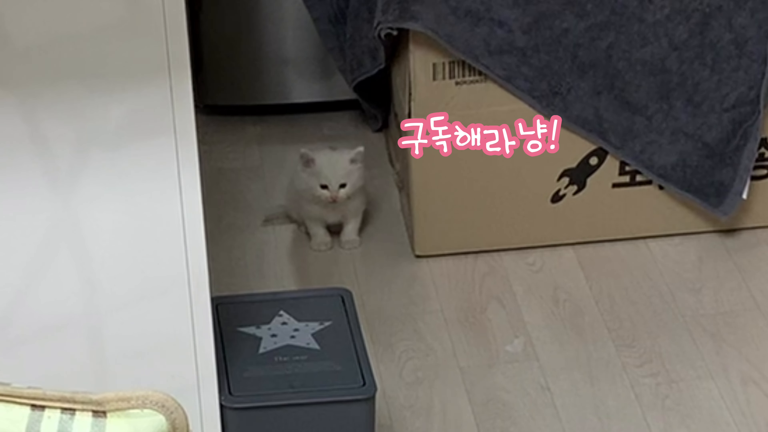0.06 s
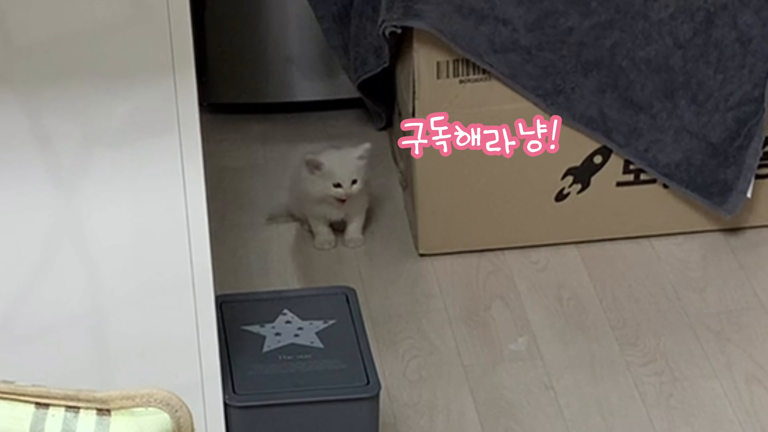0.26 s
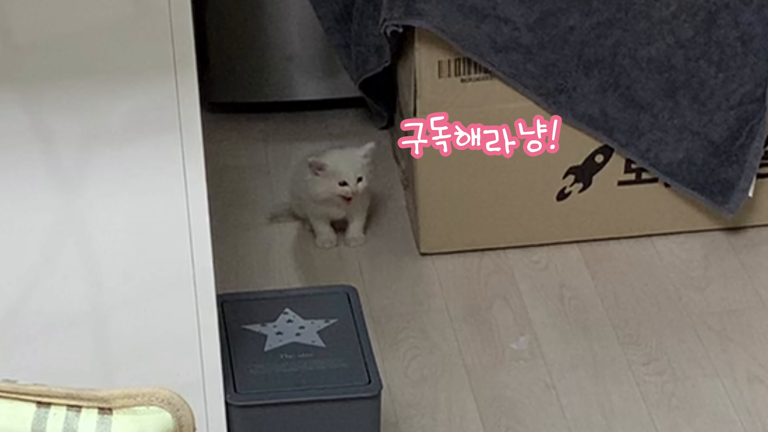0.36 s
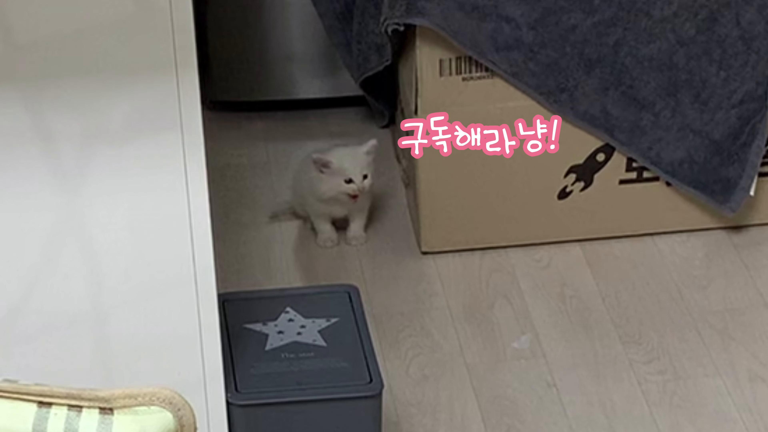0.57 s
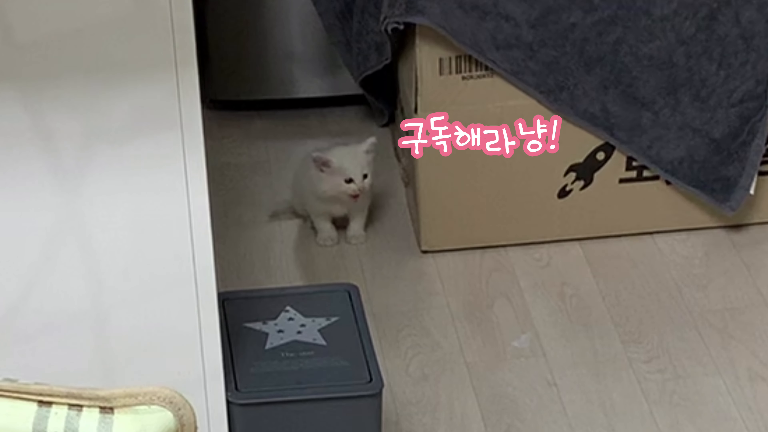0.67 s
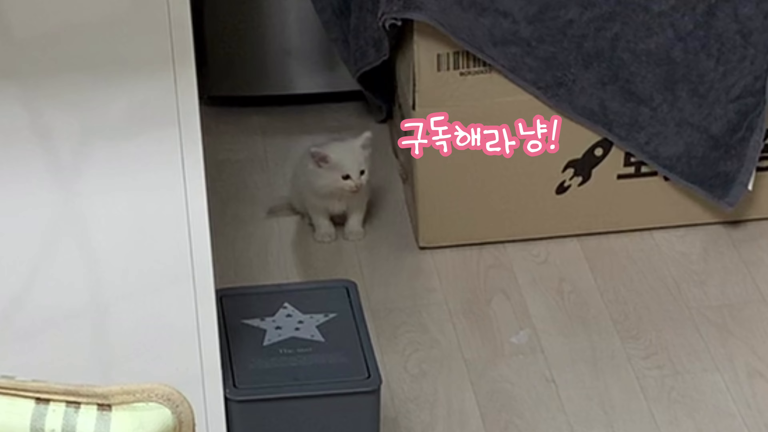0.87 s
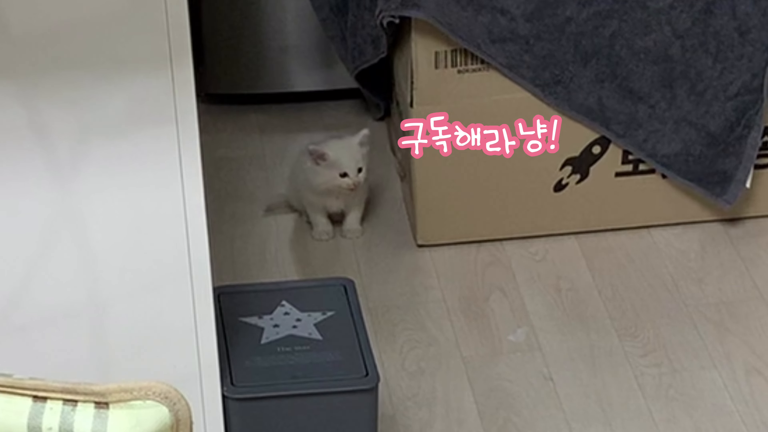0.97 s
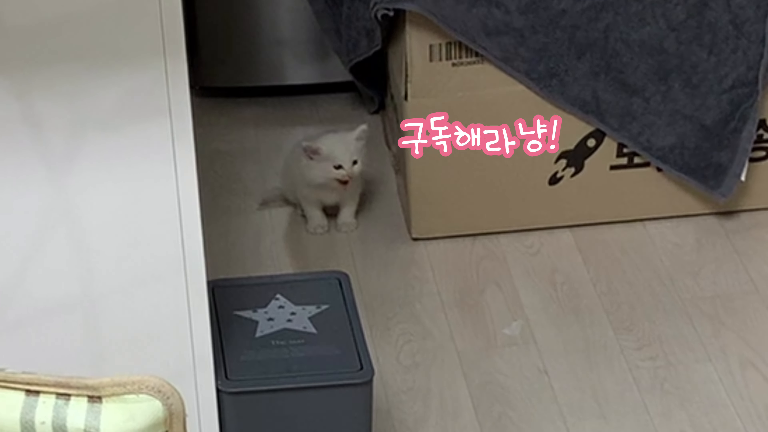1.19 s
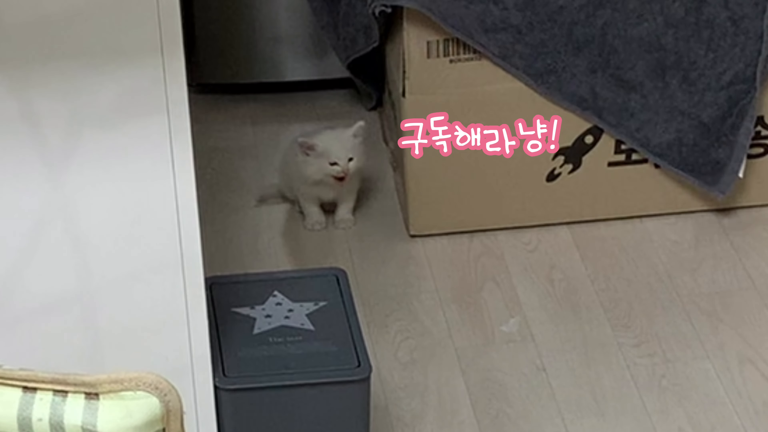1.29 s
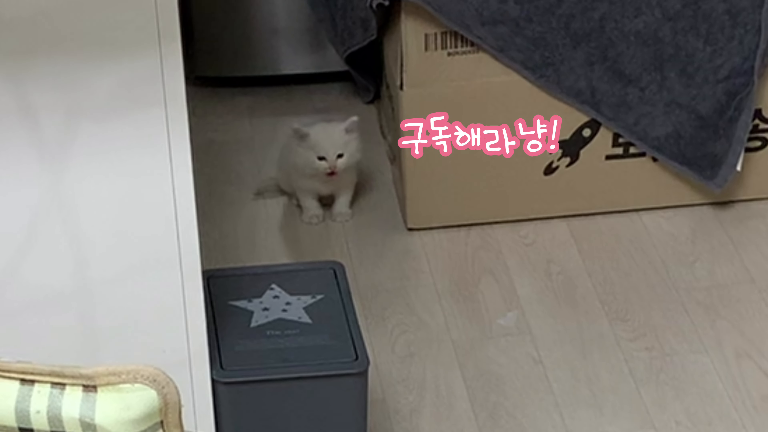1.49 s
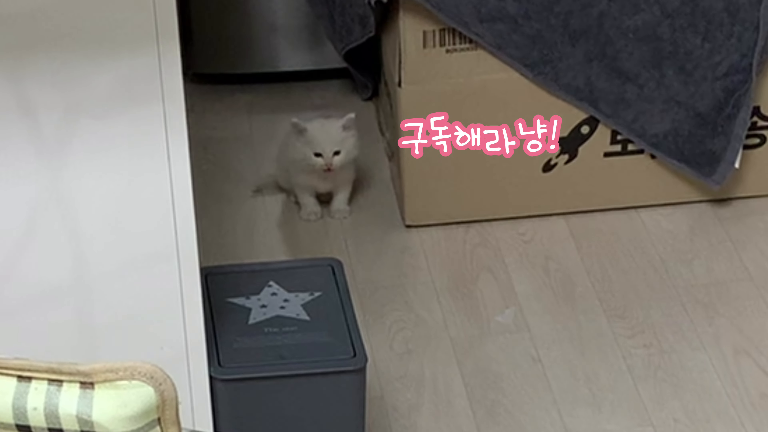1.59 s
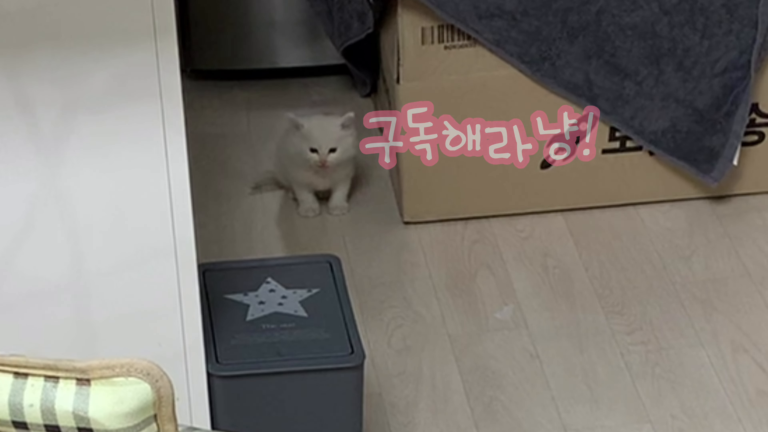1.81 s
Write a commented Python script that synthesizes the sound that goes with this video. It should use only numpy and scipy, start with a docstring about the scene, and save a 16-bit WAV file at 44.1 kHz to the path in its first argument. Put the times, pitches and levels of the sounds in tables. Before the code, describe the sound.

A kitten gives two short meows, each starting hoarse, quickly rising clear and bright, then sinking to a rough, dull close. Hard floor and furniture reflect them in a quiet home, heard from a little distance.

```python
"""Two meows from a kitten on a wooden floor: each starts hoarse, clears, then sinks and roughens to a dull "ow".
Floor and furniture answer at once, the quiet room rings briefly, and a faint rumble lies underneath.
A cry is vocal-fold harmonics and pulsed air noise, shaped by resonances that shift as the mouth closes.
Room answers are decaying stereo noise; the background is filtered noise with two steady drones and a hum."""
import sys
import numpy as np
from scipy import signal
from scipy.fft import rfft, irfft, next_fast_len
from scipy.io import wavfile
from scipy.ndimage import map_coordinates

SR = 44100
rng = np.random.default_rng(int(sys.argv[2]) if len(sys.argv) > 2 else 0)


def digitize_waveform(pressure):
    """Quantize a signal to 16-bit integers and store it at the path in sys.argv[1].

    Rows of a 2-D input are taken as channels; values are limited to [-1, 1].
    """
    field = np.atleast_2d(pressure).T
    bounded = np.clip(field, -1, 1)
    quanta = np.round(bounded * 32767).astype(np.int16)
    wavfile.write(sys.argv[1], SR, quanta)


N = 81585  # length in samples


def amp(db):
    """Decibels to amplitude gain."""
    return 10 ** (np.asarray(db) / 20)


def unit(x):
    """Scale to rms 1."""
    return x / np.sqrt(np.mean(x ** 2) + 1e-20)


def along(points, hz):
    """Read (Hz, value) points at hz, in straight lines on a log frequency axis."""
    point_hz, values = np.transpose(points)
    return np.interp(np.log(hz + 1), np.log(point_hz + 1), values)


def curves(rows, t):
    """Read each column after the time at the times t."""
    seconds, *columns = np.transpose(rows)
    return [np.interp(t, seconds, column) for column in columns]


def wobble(rate, size):
    """A smooth random curve with rate knots a second."""
    return map_coordinates(rng.standard_normal(4096), [np.arange(size) * rate / SR], mode="wrap")


def filtered(x, response):
    """Multiply the spectrum of x by a response of frequency, which may be complex."""
    m = next_fast_len(x.shape[-1] + 8192)
    return irfft(rfft(x, m) * response(np.fft.rfftfreq(m, 1 / SR)), m)[..., :x.shape[-1]]


# How alike diffuse sound is at the left and right of the stereo pickup.
# Each row: frequency in Hz, left-right correlation [0-1].
LIKENESS = [(100, .95), (700, .72), (1400, .4), (2200, .2), (3000, .65), (4000, .92), (7000, .95),
            (15000, .93)]


def diffuse(size):
    """Stereo white noise as from all sides: more shared mid noise makes left and right more alike."""
    def mid_side_gains(hz):
        angle = np.arccos(np.clip(along(LIKENESS, hz), -1, 1)) / 2
        return np.array([np.cos(angle), np.sin(angle)])

    mid, side = filtered(rng.standard_normal((2, size)), mid_side_gains)
    return np.array([mid + side, mid - side])


def drone(centre, width):
    """A narrow band of stereo noise, rms 1, at half amplitude one width from its centre."""
    return unit(filtered(diffuse(N), lambda hz: 1 / (1 + ((hz - centre) / width) ** 2)))


# Spectrum shape of the faint room rumble. Each row: frequency in Hz, relative density in dB per Hz.
RUMBLE_SPECTRUM = [(25, -31.5), (50, -6.5), (110, -6.5), (300, -1.5), (520, -10), (850, -4.5),
                   (1200, -15.5), (2000, -24), (4000, -32), (8000, -38), (14000, -35.5), (15500, -45)]
RUMBLE_DB = -64  # rms level


def rumble():
    """Diffuse noise filtered to the spectrum of the quiet room."""
    return amp(RUMBLE_DB) * unit(filtered(diffuse(N), lambda hz: amp(along(RUMBLE_SPECTRUM, hz))))


# Narrow bands that stand in the background. Each row: centre in Hz, width in Hz, rms level in dB.
STEADY_BANDS = [(118, 14, -73), (730.4, 6.3, -76)]


def steady_drones():
    """Narrow noise bands held at constant levels."""
    return sum(amp(db) * drone(centre, width) for centre, width, db in STEADY_BANDS)


# Swells of the low hum. Each row: time in seconds, level in dB before HUM_GAIN_DB.
HUM_LEVEL = [(0.0, -67), (0.262, -56.5), (0.314, -69.5), (0.958, -76.5), (1.03, -54.5), (1.086, -68),
             (1.272, -61), (1.314, -72.5), (1.514, -60.5), (1.73, -80), (1.762, -60), (1.85, -63)]
HUM_HZ, HUM_WIDTH_HZ, HUM_GAIN_DB = 212.7, 23, -0.5


def hum():
    """A low narrow band of noise that swells and fades."""
    level_db, = curves(HUM_LEVEL, np.arange(N) / SR)
    return amp(level_db + HUM_GAIN_DB) * drone(HUM_HZ, HUM_WIDTH_HZ)


def background():
    """Room tone: the rumble, the steady drones and the hum added together."""
    return rumble() + steady_drones() + hum()


# Decay of the room tail. Each row: frequency in Hz, time to fall 60 dB in seconds.
TAIL_T60 = [(200, 0.18), (700, 0.48), (2500, 0.36), (5000, 0.24), (8000, 0.16), (15000, 0.067)]
TAIL_DB, TAIL_BUILD_S = -4, 0.0072  # level against the direct sound, time constant of the onset
NEAR_DB, NEAR_T60_S = -1, 0.11  # floor, box and cupboard close by


def room(x):
    """Direct sound, quick answers from nearby surfaces and a tail whose decay depends on frequency."""
    size = SR * 3 // 4
    t = np.arange(size) / SR
    near = diffuse(size) * amp(-60 * t / NEAR_T60_S)
    hz, frames, z = signal.stft(diffuse(size), SR, nperseg=256)
    decay = amp(-60 * frames / along(TAIL_T60, hz)[:, None])
    tail = signal.istft(z * decay, SR, nperseg=256)[1][:, :size]
    tail = tail * (1 - np.exp(-t / TAIL_BUILD_S))
    near = amp(NEAR_DB) * near / np.linalg.norm(near[0])
    tail = amp(TAIL_DB) * tail / np.linalg.norm(tail[0])
    wet = signal.fftconvolve(x[None], near + tail, axes=1)[:, :N]
    return (x + wet) / np.sqrt(1 + amp(NEAR_DB) ** 2 + amp(TAIL_DB) ** 2)


# Throat and mouth resonances. Each row: open centre in Hz, closed centre in Hz, width in Hz,
# open gain in dB, closed gain in dB.
RESONANCES = [(1510, 2700, 130, -17, -20), (1950, 1850, 810, -17, -5.5), (3905, 2240, 402, 3, 0.5),
              (4240, 4500, 740, -18, -5.5), (6750, 3800, 990, -5, -20), (7600, 2300, 530, -45.5, -46),
              (11800, 4300, 6000, -26.5, -29.5), (14700, 20000, 680, -35.5, -33)]
OPEN_S, OPEN_DULL_DB_PER_KHZ, DULL_ABOVE_HZ = 0.037, 7.5, 3040  # the treble comes in as the mouth opens
UPPER_HZ, TOP_HZ, SHELF_HZ = 5030, 8680, 400  # edges of the two treble gains, and how gradual they are
LOW_CUT_HZ = 820  # the small mouth radiates little below this


def mouth(hz, closed, upper_db, top_db, age):
    """Gain of the resonances, each sliding from its open to its closed centre as the mouth closes."""
    power = 0
    for open_hz, closed_hz, width, open_db, closed_db in RESONANCES:
        centre = open_hz + (closed_hz - open_hz) * closed
        peak = amp(open_db + (closed_db - open_db) * closed)
        power = power + (peak / (1 + ((hz - centre) / width) ** 2)) ** 2
    still_opening = np.clip(1 - age / OPEN_S, 0, 1)
    dull_db = OPEN_DULL_DB_PER_KHZ * still_opening * np.maximum(hz - DULL_ABOVE_HZ, 0) / 1000
    above = lambda edge: .5 + .5 * np.tanh((hz - edge) / SHELF_HZ)
    shelf_db = upper_db * above(UPPER_HZ) + (top_db - upper_db) * above(TOP_HZ)
    radiation = hz ** 4 / (hz ** 4 + LOW_CUT_HZ ** 4)
    return np.sqrt(power) * amp(shelf_db - dull_db) * radiation


# Sizes of the random wobbles, each with its knots per second.
JITTER, JITTER_PER_S = .035, 330  # pitch scatter in log frequency, in proportion to roughness
BREAK, BREAK_PER_S = 0.1296, 170  # at the roughest the pitch breaks up, in log frequency
WAVER, WAVER_PER_S = 0.0036, 52  # constant slight waver in log frequency
SHIMMER_DB, SHIMMER_PER_S = 3, 170  # level scatter at full roughness


def wavering_pitch(hz, rough):
    """Vocal folds never repeat exactly: the pitch scatters more as the voice roughens."""
    size = len(hz)
    scatter = JITTER * rough * wobble(JITTER_PER_S, size)
    scatter = scatter + BREAK * rough ** 4 * wobble(BREAK_PER_S, size)
    return hz * np.exp(scatter + WAVER * wobble(WAVER_PER_S, size))


def fold_overtones(hz, phase, closed, upper_db, top_db, age):
    """Harmonics 2 to 39 of the vocal folds, weighted by the mouth and held at rms 1."""
    k = np.arange(2, 40)[:, None]
    gains = mouth(k * hz, closed, upper_db, top_db, age) * (k * hz < SR / 2)
    return np.sum(gains * np.sin(k * phase), 0) / np.sqrt(np.sum(gains ** 2, 0) / 2)


def pulsed_air(phase, closed, upper_db, top_db, age):
    """Air noise let through once per fold cycle and shaped by the mouth, rms 1."""
    size = len(phase)
    pulsed = rng.standard_normal(N)[:size] * (1 + np.cos(phase))
    hz, frames, z = signal.stft(pulsed, SR, nperseg=256)
    mouth_curves = [np.interp(frames, age, curve) for curve in (closed, upper_db, top_db)]
    shape = mouth(hz[:, None], *mouth_curves, frames)
    shape = shape / np.linalg.norm(shape, axis=0)  # the mouth sets the colour, not the level
    return unit(signal.istft(z * shape, SR, nperseg=256)[1][:size])


CROAK_HZ, CROAK_WIDTH_HZ, CROAK_SHARE = 527, 150, 0.93  # share of the power at full roughness


def croaking_fundamental(phase, rough):
    """The lowest harmonic, which breaks into a low croak of narrow noise when rough."""
    band = lambda hz: 1 / (1 + ((hz - CROAK_HZ) / CROAK_WIDTH_HZ) ** 4)
    croak = unit(filtered(rng.standard_normal(N)[:len(phase)], band))
    broken = np.clip(CROAK_SHARE * rough ** 4, 0, 1)
    return np.sqrt(1 - broken) * unit(np.sin(phase)) + np.sqrt(broken) * croak


RASP_DB = -6.5  # air noise against the overtones at full roughness
FADE_S = 0.013
SWELL_S, SWELL_DB = 0.065, 4  # each cry starts this much softer


def meow(pitch, level, voice, first_hz, last_hz, overtone_db, fundamental_db):
    """Vocal-fold harmonics and the air noise pulsed with them, under the level curves of one cry."""
    first = int((level[0][0] - FADE_S) * SR)
    t = np.arange(first, int((level[-1][0] + FADE_S) * SR)) / SR
    age = t - t[0]
    closed, rough, upper_db, top_db = curves(voice, t)
    closed, rough = np.clip([closed, rough], 0, 1)
    high_db, low_db = curves(level, t)
    hz, = curves([(t[0], first_hz), *pitch, (t[-1], last_hz)], t)
    hz = wavering_pitch(hz, rough)
    phase = 2 * np.pi * np.cumsum(hz) / SR
    overtones = fold_overtones(hz, phase, closed, upper_db, top_db, age)
    air = pulsed_air(phase, closed, upper_db, top_db, age)
    cry = amp(high_db + overtone_db) * (overtones + amp(RASP_DB) * rough * air)
    cry = cry + amp(low_db + fundamental_db) * croaking_fundamental(phase, rough)
    swell = amp(-SWELL_DB * np.clip(1 - age / SWELL_S, 0, 1))
    fade = np.clip(np.minimum(age, t[-1] - t) / FADE_S, 0, 1)
    shimmer = amp(SHIMMER_DB * rough * wobble(SHIMMER_PER_S, len(t)))
    return np.pad(cry * swell * fade * shimmer, (first, N))[:N]


# Ends and balance, one row a cry. Each row: first pitch in Hz, last pitch in Hz,
# overtone gain in dB, fundamental gain in dB.
CRY_SETTINGS = [(337, 480, -0.5, -2.5), (328.7, 410, 0.5, -2)]
# Voiced middle of the first cry. Each row: time in seconds, pitch in Hz before the random waver.
FIRST_PITCH = [(.25, 607.5), (.275, 698.3), (.31, 738.1), (.35, 736.2), (.4, 700), (.45, 655.5),
               (.5, 608.6), (.55, 559.7), (.62, 492.7)]
# Its loudness. Each row: time in seconds, overtones in dB, fundamental in dB, before gains, swell and shimmer.
FIRST_LEVEL = [(0.19, -63.5, -60), (0.218, -41.5, -52), (0.246, -27.5, -53.5), (0.302, -21.5, -51.5),
               (0.33, -23.5, -43), (0.362, -24.5, -45.5), (0.38, -21.5, -60), (0.45, -27, -43),
               (0.486, -26.5, -57), (0.542, -27.5, -43), (0.572, -34, -56), (0.65, -38, -52.5),
               (0.672, -53, -47.5), (0.71, -52, -65)]
# Its mouth and throat. Each row: time in seconds, mouth closed [0-1], roughness (clipped to 0-1),
# gain above UPPER_HZ in dB, gain above TOP_HZ in dB.
FIRST_VOICE = [(.2, 0.72, 0.76, -13, -3.5), (0.252, 0, 0.7, -4.5, -10.5), (.3, 0.08, 0.1, 2.5, 5),
               (.38, 0.16, 0.13, 2, 3.5), (0.441, 0.21, 0.38, 0.5, -1), (.52, 0.3, 0.41, -2, -5),
               (.58, 0.66, 0.63, 0, 1.5), (0.679, 0.98, 1.04, -3, -6)]


def first_meow():
    """The first cry: the folds' pitch rises and sinks while the mouth opens and closes."""
    return meow(FIRST_PITCH, FIRST_LEVEL, FIRST_VOICE, *CRY_SETTINGS[0])


# Voiced middle of the second cry. Each row: time in seconds, pitch in Hz before the random waver.
SECOND_PITCH = [(1.06, 510), (1.08, 609), (1.1, 656.7), (1.13, 681.3), (1.19, 674.4), (1.25, 646.3),
                (1.31, 616.3), (1.37, 573.3), (1.44, 505.7)]
# Its loudness. Each row: time in seconds, overtones in dB, fundamental in dB, before gains, swell and shimmer.
SECOND_LEVEL = [(1.01, -77, -77.5), (1.042, -42.5, -53), (1.08, -26.5, -51), (1.102, -29, -50),
                (1.18, -25, -41.5), (1.212, -27.5, -60), (1.232, -26, -53), (1.264, -25.5, -46.5),
                (1.29, -26.5, -71), (1.308, -28, -47.5), (1.36, -32.5, -43), (1.406, -33.5, -64.5),
                (1.486, -43.5, -46), (1.52, -63, -64.5)]
# Its mouth and throat. Each row: time in seconds, mouth closed [0-1], roughness [0-1],
# gain above UPPER_HZ in dB, gain above TOP_HZ in dB.
SECOND_VOICE = [(1.029, .9, .8, -12.5, -4.5), (1.076, 0.093, 0.51, -6.5, -10), (1.129, 0.16, .2, 6, -5.5),
                (1.198, 0.22, 0.091, 0, -6.5), (1.28, .1, 0.045, -7.5, -8.5), (1.35, .55, 0.14, 0, 2),
                (1.409, 0.714, .45, 0.5, 1), (1.478, 0.9, 0.91, -6.5, -3.5)]


def second_meow():
    """The second cry, from the same folds and mouth with a slightly lower pitch peak."""
    return meow(SECOND_PITCH, SECOND_LEVEL, SECOND_VOICE, *CRY_SETTINGS[1])


def scene():
    """Two cries in the room over its background."""
    first = first_meow()
    second = second_meow()
    return room(first) + room(second) + background()


LEAD_S, LEAD_ABOVE_HZ = 0.0002219, 2366  # lead of left over right, and where it begins
BAND_LIMIT_HZ = 15830


def record(dry):
    """Stereo pickup: the left channel leads slightly in the treble; nothing passes the band limit."""
    def pickup(hz):
        lead = np.pi * LEAD_S * np.maximum(hz - LEAD_ABOVE_HZ, 0)  # half the lead, as phase in radians
        return np.exp(1j * np.array([lead, -lead])) * (hz < BAND_LIMIT_HZ)

    return filtered(dry, pickup)


dry = scene()
out = record(dry)
digitize_waveform(out)
```